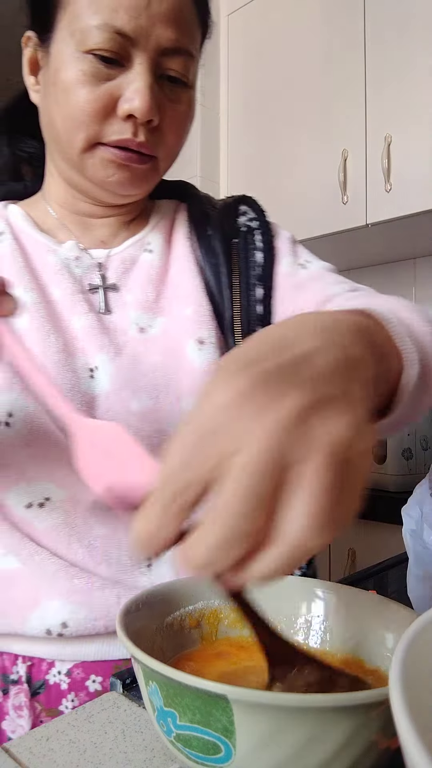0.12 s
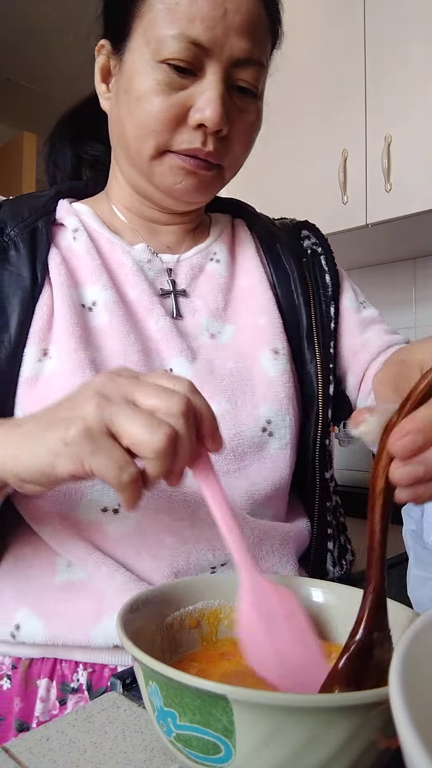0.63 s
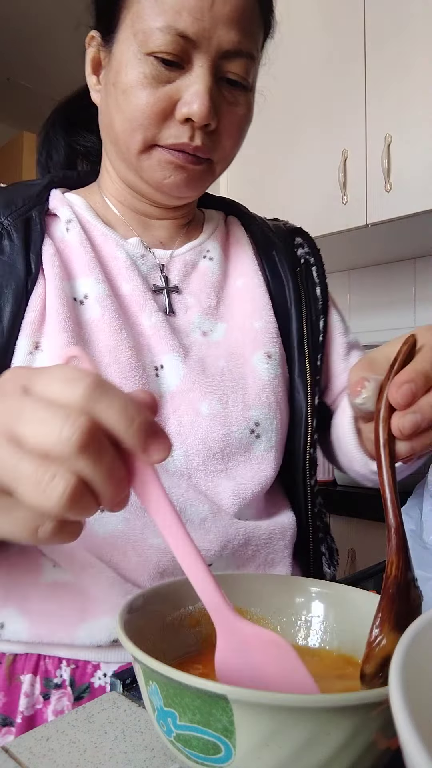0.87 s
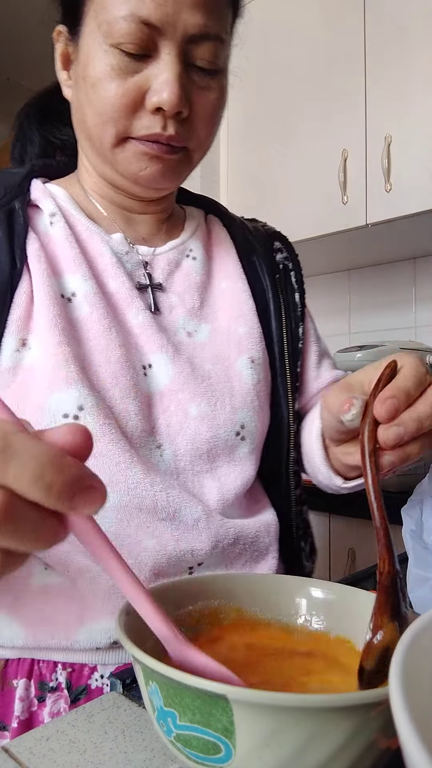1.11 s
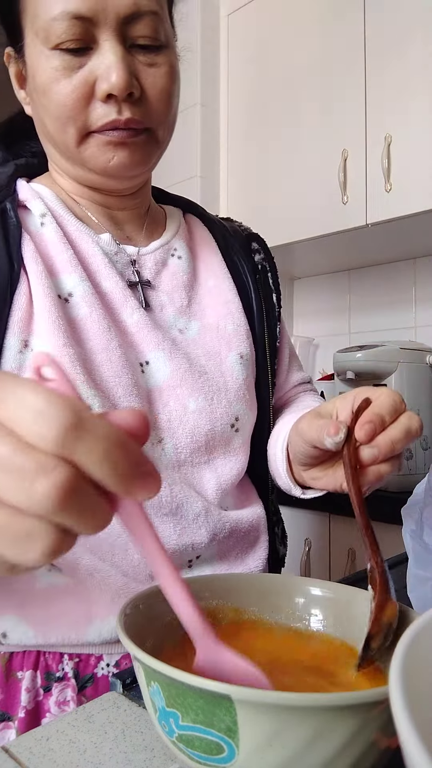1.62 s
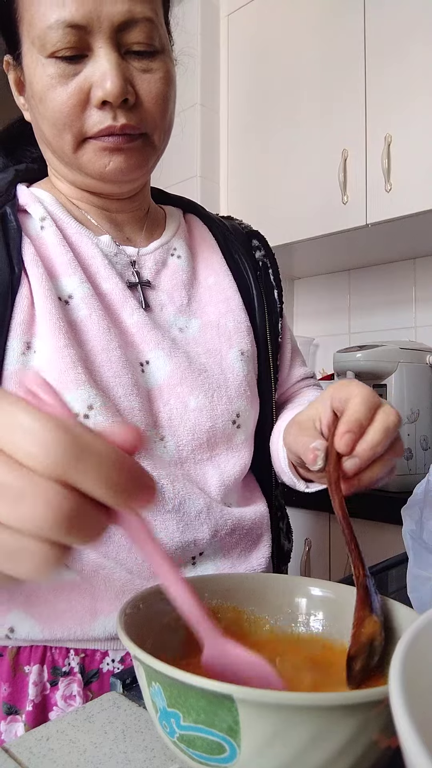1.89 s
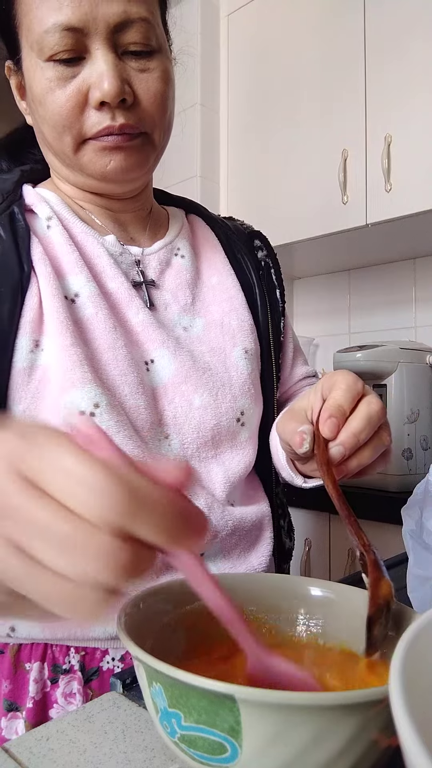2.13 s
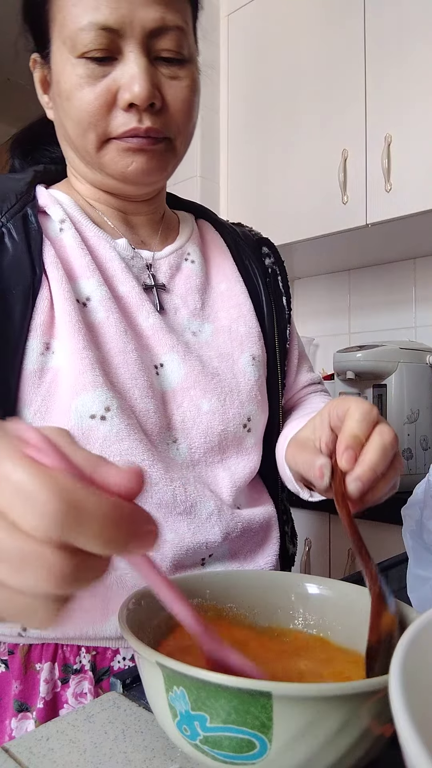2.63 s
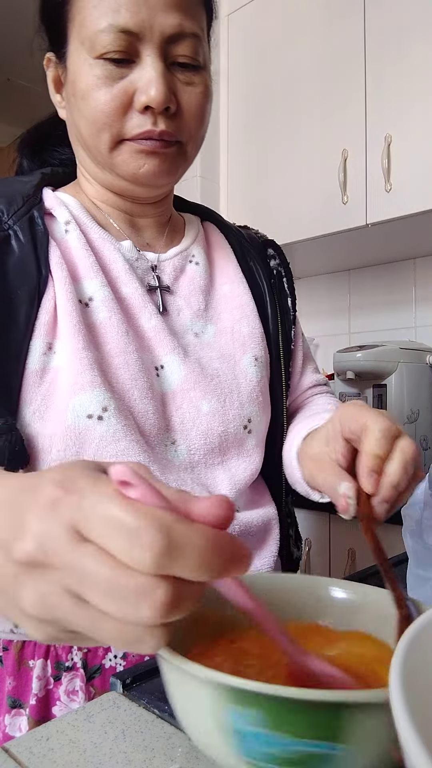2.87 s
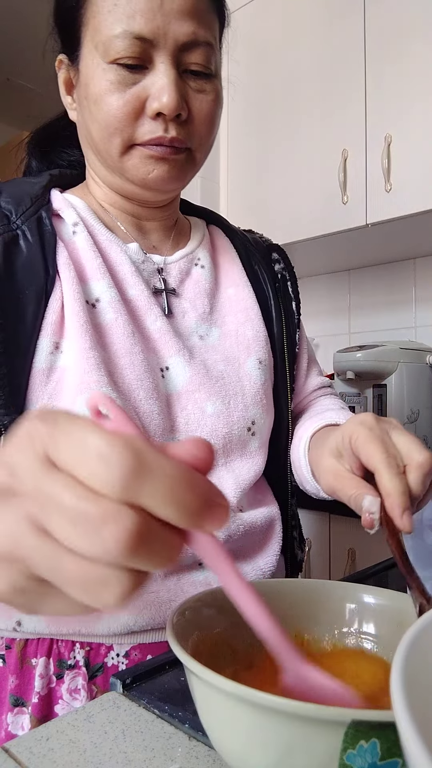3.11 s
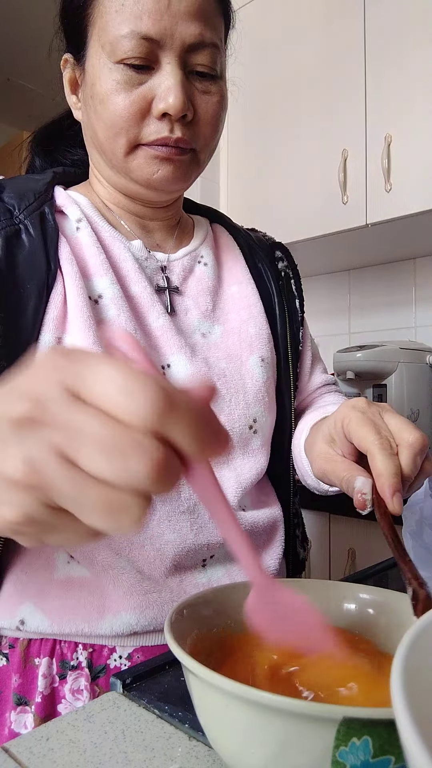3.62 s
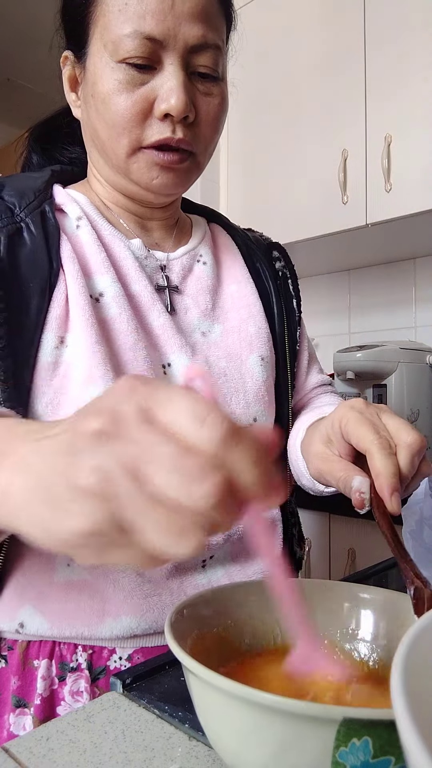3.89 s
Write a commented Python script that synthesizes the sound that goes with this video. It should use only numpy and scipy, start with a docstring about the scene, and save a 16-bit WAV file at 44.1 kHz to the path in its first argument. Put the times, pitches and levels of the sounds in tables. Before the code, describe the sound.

Bowl knocks and wet smacks as a spatula stirs batter in a quiet small kitchen

```python
"""Knocks, drags, squeaks and wet smacks: a soft spatula stirs batter in a thick bowl on a kitchen counter.
It excites damped modes of the bowl, bumps a wooden spoon and at times jolts the counter into low thuds.
Friction is a train of small slips through wall resonances; batter and quiet air are shaped noise, and a faint,
narrow noise band glides down. A small hard room answers; a microphone with a noise suppressor picks it up."""
import sys
import numpy as np
from scipy import signal
from scipy.fft import rfft, irfft, next_fast_len
from scipy.io import wavfile
from scipy.ndimage import uniform_filter1d, map_coordinates

SR = 44100
rng = np.random.default_rng(int(sys.argv[2]) if len(sys.argv) > 2 else 0)


def how_loud(loudness_db):
    """Turn decibels into a plain amplitude multiplier (0 dB gives 1, 20 dB gives 10)."""
    steps = np.asarray(loudness_db, float) / 20
    return 10 ** steps


def bounce(signal):
    """Save signal as a 16-bit WAV file at the path given by the first command-line argument."""
    frames = np.transpose(np.atleast_2d(signal))
    limited = np.clip(frames, -1, 1)
    pcm = np.round(limited * 32767).astype(np.int16)
    wavfile.write(sys.argv[1], SR, pcm)


N = 176400

# spectrum of the kitchen's quiet air: freq_hz, level_db
AIR = [(60, 14), (200, -11), (420, -6.5), (1200, -13.5), (2500, -17), (8000, -24.5), (10000, -39.5)]
BLOW_T = np.arange(SR // 4) / SR  # time within one blow (s)
BOWL_CUT = signal.butter(2, 230, "high", fs=SR, output="sos")  # a small bowl radiates little bass


def unit(x):
    """Normalization by energy: rms 1."""
    return x / np.sqrt(np.mean(x ** 2) + 1e-20)


def top(x):
    """Normalization by extreme value: peak 1."""
    return x / np.abs(x).max()


def along(points, hz):
    """Interpolation of (Hz, value) points on a logarithmic frequency axis."""
    f, v = np.transpose(points)
    return np.interp(np.log(hz + 1), np.log(f + 1), v)


def decay(t, t60_s):
    """Exponential damping: the level falls by 60 dB in t60_s."""
    return how_loud(-60 * t / t60_s)


def onset(t, rise_s):
    """Exponential build-up towards 1 with time constant rise_s."""
    return 1 - np.exp(-t / rise_s)


def filtered(x, response):
    """Linear filtering: the spectrum of x times a response of frequency."""
    size = next_fast_len(len(x) + 8192)
    spectrum = rfft(x, size) * response(np.fft.rfftfreq(size, 1 / SR))
    return irfft(spectrum, size)[:len(x)]


def hiss(spectrum, size):
    """Spectral shaping: white noise coloured by (Hz, dB) points, rms 1."""
    return unit(filtered(rng.standard_normal(size), lambda hz: how_loud(along(spectrum, hz))))


def wobble(rate):
    """Slow random modulation: a smooth curve through rate random knots a second."""
    knots = rng.standard_normal(int(N * rate / SR) + 4)
    return map_coordinates(knots, [np.arange(N) * rate / SR])


def patchy(x):
    """Random time-frequency modulation: small patches swell and sink like uneven wetness; rms 1."""
    z = signal.stft(x, nperseg=256)[2]
    field = rng.standard_normal(z.shape)
    field = uniform_filter1d(uniform_filter1d(field, 5, 0), 5, 1)
    return unit(signal.istft(z * how_loud(3.5 * unit(field)), nperseg=256)[1][:len(x)])


def ring(modes, t, soft_s):
    """Modal synthesis: damped modes, scattered anew each time, driven by a soft, chattering contact; peak 1."""
    hz, db, t60 = np.transpose(modes)[:, :, None]
    hz = hz * (1 + 0.037 * rng.standard_normal(hz.shape))
    db = db + 3 * rng.standard_normal(hz.shape)
    modal = (how_loud(db) * decay(t, t60) * np.sin(2 * np.pi * hz * t)).sum(0)
    touches = rng.random(len(t)) < 500 / SR  # 500 a second on average
    chatter = touches * rng.standard_normal(len(t)) * decay(t, 0.03)
    pulse = np.hanning(3 + round(soft_s * SR))  # softness spreads each touch in time
    contact = np.convolve(0.51 * chatter + (t == 0), pulse)[:len(t)]
    return top(signal.fftconvolve(modal, contact)[:len(t)])


def room(x):
    """Statistical reverberation: a fresh noise tail in which each frequency dies at its own speed."""
    # reverberation time of the small hard room: freq_hz, t60_s
    decay_times = [(150, 0.79), (500, 0.43), (1500, 0.26), (5000, 0.35), (12000, 0.31)]
    hz, t, z = signal.stft(rng.standard_normal(SR // 2), SR, nperseg=256)
    tail = signal.istft(z * decay(t, along(decay_times, hz)[:, None]), SR, nperseg=256)[1]
    tail = np.pad(tail / np.linalg.norm(tail), (200, 0))  # delay in samples ahead of the tail
    return how_loud(-10.5) * signal.fftconvolve(x, tail)


def add(out, start_s, blow):
    """Superposition: adds a blow and the room's answer from start_s on."""
    i, wet = round(start_s * SR), room(blow)
    out[i:i + len(blow)] += blow
    out[i:i + len(wet)] += wet


def air():
    """Stationary coloured noise: the kitchen's quiet air."""
    return how_loud(-56.5) * hiss(AIR, N)


def gliding_band():
    """Amplitude modulation: noise on a falling carrier, a faint narrow band perhaps left by the suppressor."""
    # path of the band: time_s, centre_hz, level_db
    glide = [(0, 2150, -66.5), (0.304, 2090, -70), (0.502, 1700, -64.5), (.52, 1650, -110)]
    s, hz, db = np.transpose(glide)
    t = np.arange(N) / SR
    carrier = np.sin(2 * np.pi * np.cumsum(np.interp(t, s, hz)) / SR)
    band = unit(wobble(450)) * how_loud(3 * wobble(25)) * carrier
    return how_loud(np.interp(t, s, db)) * band


def thuds():
    """Structure-borne sound: the bowl jolts the counter, whose low modes ring under a gritty rattle."""
    # jolts: start_s, level_db, grit_db (rattle over the modes)
    jolts = [(0.498, -18, -10), (1.906, -35, -13), (2.112, -24.5, -14), (2.958, -15, -2.5),
             (3.149, -16.5, -13.5), (3.682, -36.5, 0)]
    # counter modes: freq_hz, level_db, t60_s
    counter = [(117.5, -4.5, 0.14), (139, 9, 0.046), (166.2, -1, 0.13)]
    # rattle spectrum: freq_hz, level_db
    grit_spectrum = [(150, 2), (350, 6), (1500, -8), (2900, -12.5), (4000, -45.5)]
    out, t = np.zeros(N + SR), BLOW_T
    for start_s, level_db, grit_db in jolts:
        grit = how_loud(grit_db) * decay(t, 0.21) * onset(t, 0.0066) * hiss(grit_spectrum, len(t))
        add(out, start_s, how_loud(level_db) * (ring(counter, t, 0.00033) * onset(t, 0.015) + grit))
    return out[:N]


def stirring():
    """Friction and flow noise: each pass jerks the wall into resonance and swishes the batter in fine grains."""
    # passes of the blade: middle_s, half_length_s, friction_db, swish_db
    strokes = [(0.034, 0.13, -83, -67.5), (0.681, 0.099, -61, -63), (1.107, 0.062, -63, -55.5),
               (1.362, 0.15, -57, -56.5), (1.582, 0.049, -50.5, -52.5), (1.766, 0.066, -57, -51.5),
               (2.02, 0.049, -56.5, -60), (2.19, 0.26, -63, -60), (2.47, 0.031, -71, -61.5),
               (2.65, 0.06, -46, -52.5), (2.852, 0.06, -54.5, -55.5), (2.979, 0.034, -36, -45.5),
               (3.056, 0.12, -41, -51.5), (3.326, 0.064, -58.5, -54.5), (3.445, 0.082, -57.5, -68.5),
               (3.963, 0.03, -64, -59)]
    # resonances of the rubbed wall: freq_hz, width_hz, level_db
    resonances = [(287, 23, -4), (1009, 49, -4), (1370, 66, -2.5), (2010, 250, -15.5)]
    # batter spectrum: freq_hz, level_db
    swish_spectrum = [(1500, -33), (2600, -9.5), (3500, -8), (4300, -12), (7600, -17), (10000, -28.5),
                      (16000, -39.5)]
    s, half, drag_db, swish_db = np.transpose(strokes)[:, :, None]
    bell = np.exp(-((np.arange(N) / SR - s) / half) ** 2)

    def wall(f):
        """Resonance: a sum of band-pass responses with alternating signs."""
        total = 0
        for k, (centre, width, db) in enumerate(resonances):
            total = total + (-1) ** k * how_loud(db) * 1j * f * width / (centre ** 2 - f ** 2 + 1j * f * width)
        return total

    slips = (rng.random(N) < 350 / SR) * how_loud(3 * rng.standard_normal(N))  # 350 a second, uneven by 3 dB
    slips = slips + 0.0054 * rng.standard_normal(N)
    drag = unit(filtered(slips, wall)) * how_loud(3.22 * wobble(29.65))
    drag = drag * (how_loud(drag_db) * bell).sum(0)
    grains = how_loud(2 * wobble(45) + 2.5 * wobble(500))
    swish = patchy(hiss(swish_spectrum, N)) * grains * (how_loud(swish_db) * bell).sum(0)
    return drag + swish + room(drag + swish)[:N]


def damped_tones():
    """Damped oscillation: single dying tones, heard as squeaks, pops and two soft low bowl notes."""
    # tones: start_s, peak_db (ahead of the room), pitch_hz (scattered a little by ring)
    tones = [(0.379, -52, 363), (1.124, -39, 1380), (1.174, -48, 1370), (1.198, -35, 1364),
             (1.279, -31, 1402), (1.421, -39, 1360), (1.439, -41, 1370), (1.453, -44.5, 1080),
             (1.542, -38, 1370), (2.074, -31, 2670), (2.63, -29, 1860), (2.685, -35.5, 3360),
             (2.822, -31.5, 3240), (2.853, -37.5, 4100), (3.147, -16, 1071), (3.167, -26.5, 1100),
             (3.574, -30, 283.6)]
    out, t = np.zeros(N + SR), BLOW_T
    for start_s, peak_db, hz in tones:
        tone = ring([(hz, 0, 40 / hz)], t, 0.0001)  # 40 cycles until 60 dB down
        add(out, start_s, how_loud(peak_db) * top(tone * onset(t, 0.004)))
    return out[:N]


def clacks():
    """Impact of wet solids: spoon and spatula clack, a decaying noise burst over the spoon's short modes."""
    # clacks: start_s, level_db, t60_s (noise burst), spray_db (top octave over the rest)
    bumps = [(0.8931, -33.5, 0.12, -12), (0.9434, -29, 0.098, -38), (1.415, -40.5, 0.064, -18),
             (1.5836, -34.5, 0.033, -29), (1.7642, -21, 0.073, -14.5), (1.9855, -33.5, 0.061, -8.5),
             (2.3247, -31.5, 0.045, -2), (2.5131, -19.5, 0.031, -29), (2.9602, -18.5, 0.0079, -57.5),
             (3.046, -19, 0.18, -17), (3.0806, -28.5, 0.033, -18.5), (3.1465, -17.5, 0.075, -17.5),
             (3.257, -45.5, 0.038, 0), (3.5446, -25.5, 0.086, -8)]
    # spoon modes: freq_hz, level_db, t60_s
    spoon = [(1350, -2, .015), (3200, 0, .01), (5000, -4, .006), (7600, -5, .006)]
    # spectra of the wet smack and of its top octave: freq_hz, level_db
    smack_spectrum, spray_spectrum = [(600, -39.5), (900, -7.5), (2000, -10.5), (3200, -12.5),
                                      (7600, -13.5), (9500, -26.5)], [(7000, -27), (8500, -1), (14700, -6), (16500, -12)]
    out, t = np.zeros(N + SR), BLOW_T
    for start_s, level_db, t60_s, spray_db in bumps:
        burst = hiss(smack_spectrum, len(t)) + how_loud(spray_db) * hiss(spray_spectrum, len(t))
        smack = how_loud(-2.5) * decay(t, t60_s) * burst / 2
        clack = smack + how_loud(5.5) * ring(spoon, t, 0.0001)
        add(out, start_s, how_loud(level_db) * signal.sosfilt(BOWL_CUT, clack))
    return out[:N]


def knocks():
    """Modal excitation by impact: the spatula knocks the wall and rings the bowl's rim, belly and edge."""
    # knocks: start_s, level_db, belly_db (over the rim modes), edge_db (treble over the rim modes)
    hits = [(1.213, -24.5, -4.5, -22), (1.496, -22, -3, -23), (1.684, -11.5, -6.5, -24),
            (1.894, -10.5, -12, -17), (2.101, -8.5, -12.5, -12), (2.139, -27, -8, -20),
            (2.321, -11, -11, -14.5), (2.372, -12, -12, -19), (2.529, -8, -13.5, -23),
            (2.737, -9, -18, -18.5), (2.787, -24.5, -2.5, -31), (2.958, -3, -13.5, -6),
            (3.008, -5, -31, -15), (3.029, -14, -14, -17.5), (3.145, -14, -13, -46),
            (3.295, -30.5, -0.5, -11), (3.549, -15.5, -10, -5.5), (3.56, -18, -13, -22.5),
            (3.682, -21.5, -8.5, -11), (3.937, -18, -12, -25.5)]
    # bowl modes from low to high: freq_hz, level_db, t60_s
    belly_modes, rim_modes, edge_modes = [(264.2, 2, 0.18), (321.6, 3.5, 0.13), (354, 7.5, 0.11),
                                          (490.6, -3.5, 0.17)], [(594, -10.5, 0.071), (905, 3, 0.049),
                                                         (1088, 8, 0.018), (1230, 4.5, 0.028),
                                                         (1358, 8, 0.048), (1820, -17, 0.018),
                                                         (1972, 9.5, 0.013)], [(2516, 23, 0.014), (2932, 8, 0.066),
                                                                      (5100, -22, 0.018)]
    # dull noise of the loaded bowl: freq_hz, level_db
    body_spectrum = [(200, -19), (350, 4.5), (1400, -0.5), (2600, -13), (6000, -48.5)]
    crack_spectrum = [(2000, -44.5), (3000, 26), (6000, 6.5), (10000, -40)]
    out, t = np.zeros(N + SR), BLOW_T
    for start_s, level_db, belly_db, edge_db in hits:
        crack = how_loud(-8) * decay(t, 0.019) * hiss(crack_spectrum, len(t))
        body = how_loud(-13.5) * decay(t, 0.056) * onset(t, 0.0017) * hiss(body_spectrum, len(t))
        belly = how_loud(belly_db) * onset(t, 0.0052) * ring(belly_modes, t, 0.00022)
        rim = onset(t, 0.00045) * ring(rim_modes, t, 0.00016)
        edge = how_loud(edge_db) * (ring(edge_modes, t, 0.0002) + crack)
        add(out, start_s, how_loud(level_db) * signal.sosfilt(BOWL_CUT, rim + body + belly + edge))
    return out[:N]


def scene():
    """Superposition of all sources in one channel."""
    background = air() + gliding_band()
    return (background + thuds() + stirring() + damped_tones() + clacks() + knocks())[None]


def roll_off(x):
    """The treble ends steeply here."""
    return signal.sosfilt(signal.butter(12, 16800, fs=SR, output="sos"), x)


def record(dry):
    """High-pass pickup and spectral subtraction: bass is cut and bands that stay near the air level sink."""
    heard = signal.sosfilt(signal.butter(4, 95, "high", fs=SR, output="sos"), dry[0])
    hz, _, z = signal.stft(heard, SR, nperseg=512)
    power = uniform_filter1d(uniform_filter1d(abs(z) ** 2, 3, 0), 7, 1)
    shape = how_loud(along(AIR, hz)) ** 2
    gate = how_loud(-57.5) ** 2 * shape / shape.sum()  # noise power expected in each band
    gain = np.maximum(1 - gate[:, None] / (abs(power) + 1e-20), how_loud(-29.5))  # never below -29.5 dB
    mix = signal.istft(z * gain, SR, nperseg=512)[1][None, :N]
    return roll_off(mix)


dry = scene()
out = record(dry)
bounce(out)
```